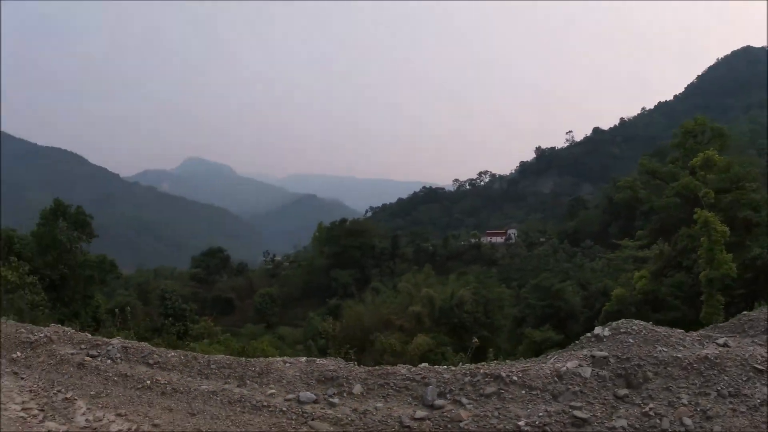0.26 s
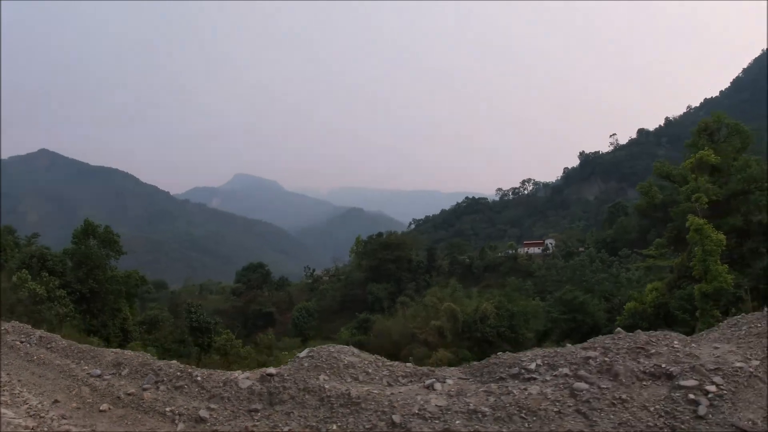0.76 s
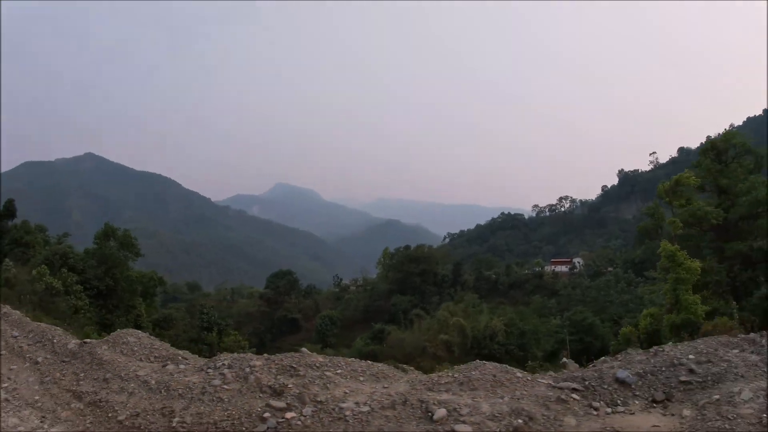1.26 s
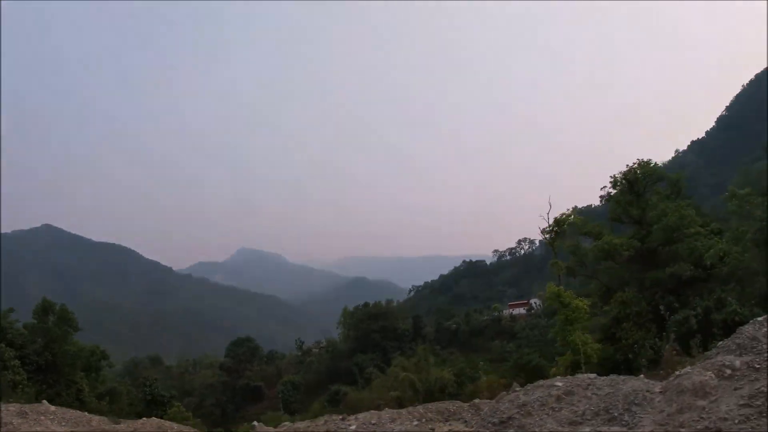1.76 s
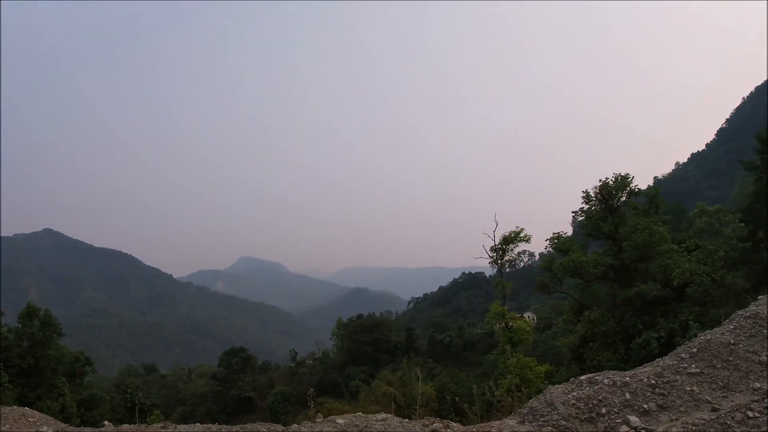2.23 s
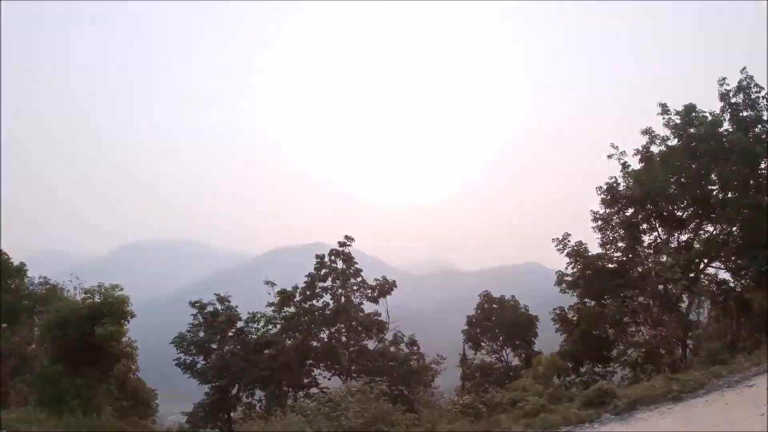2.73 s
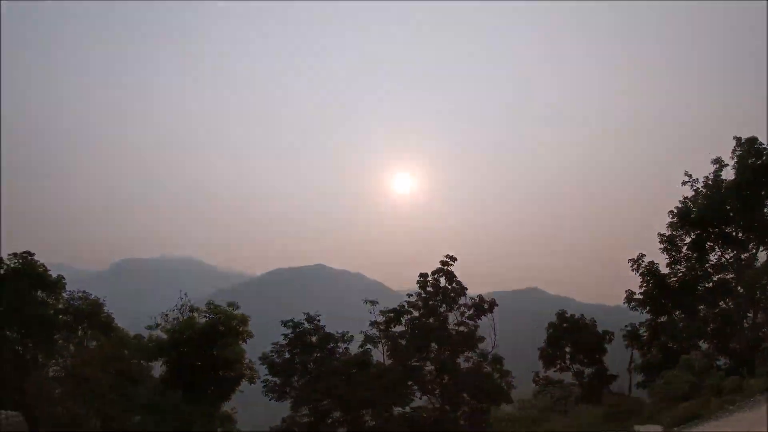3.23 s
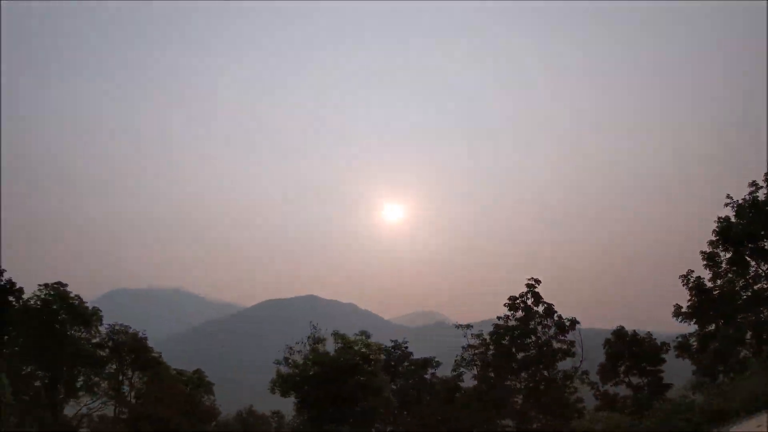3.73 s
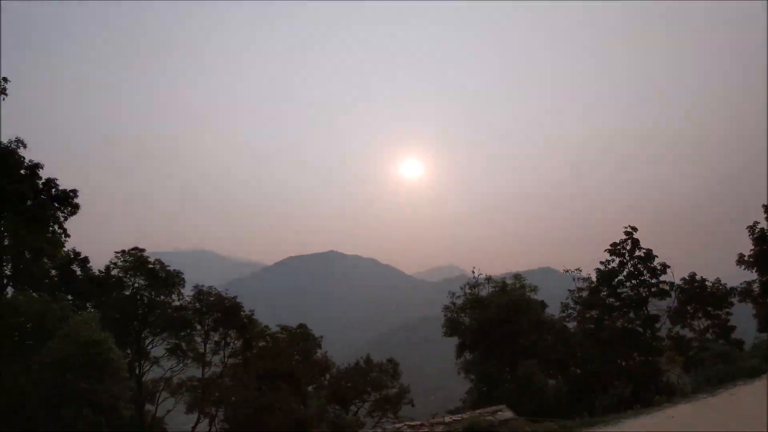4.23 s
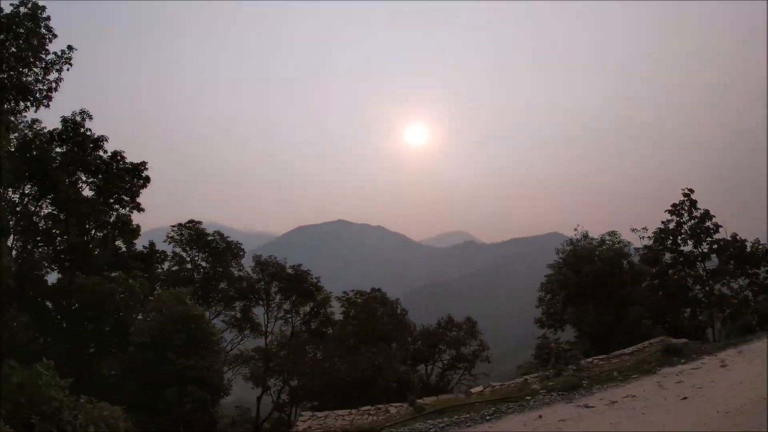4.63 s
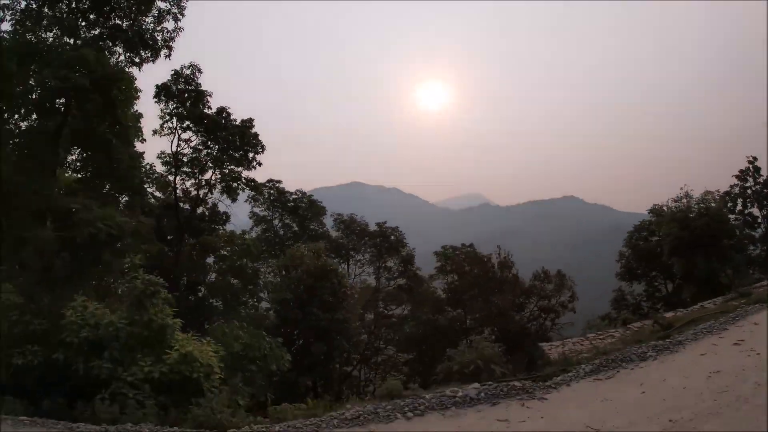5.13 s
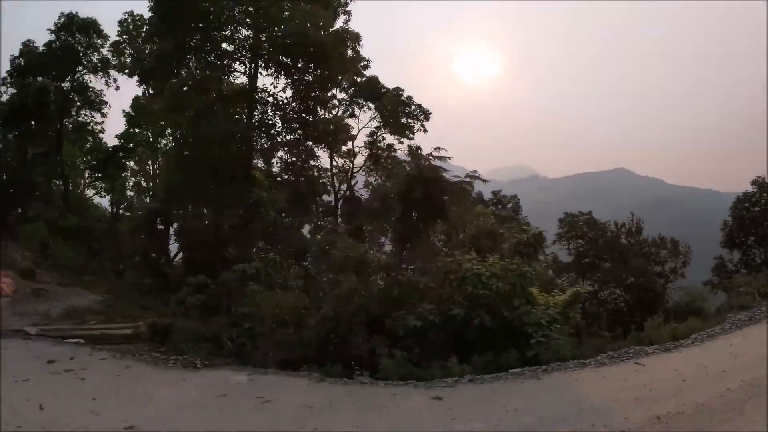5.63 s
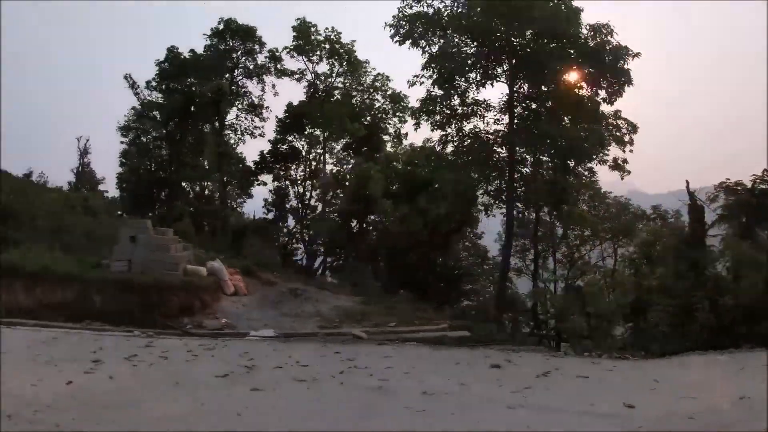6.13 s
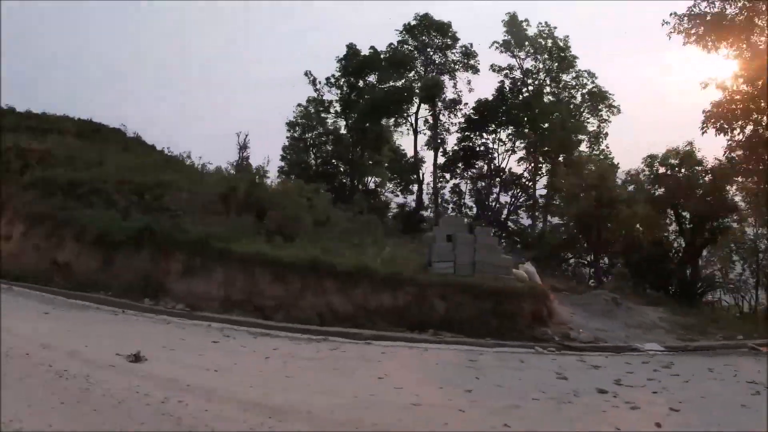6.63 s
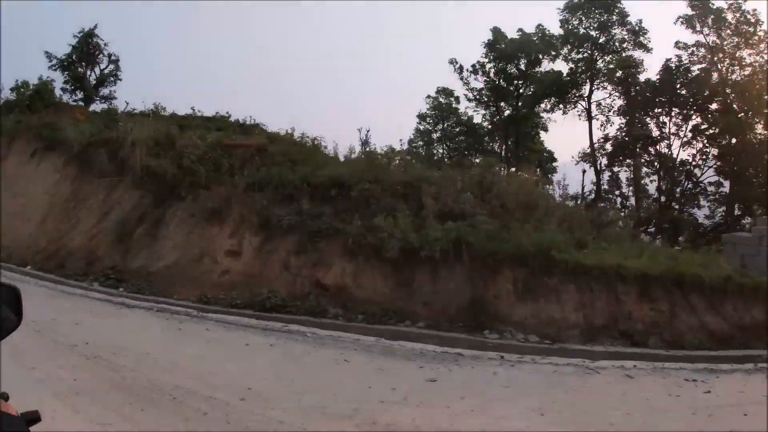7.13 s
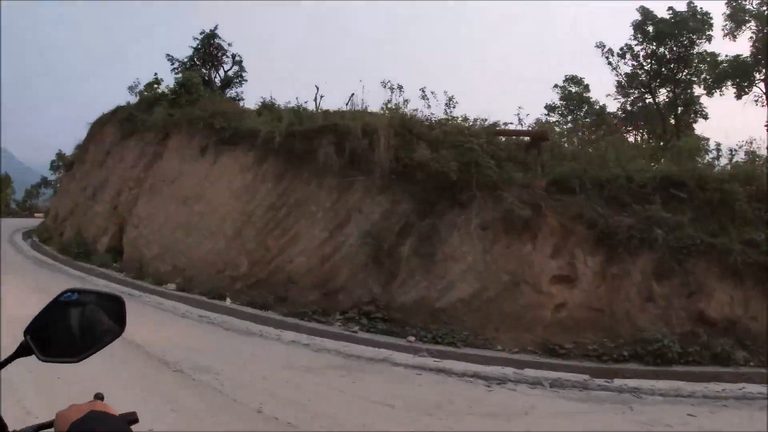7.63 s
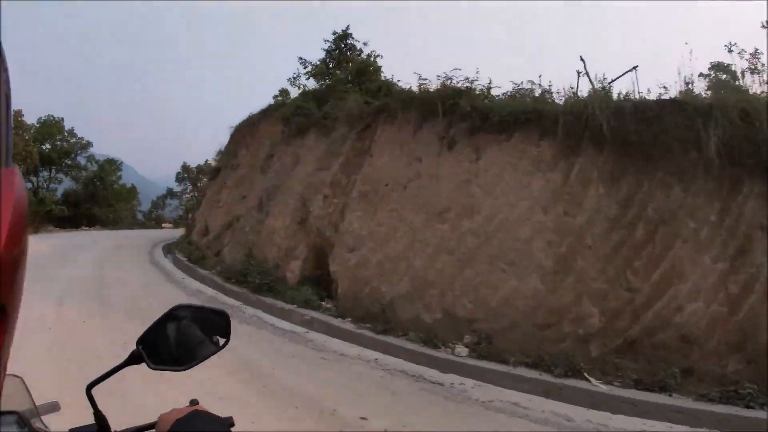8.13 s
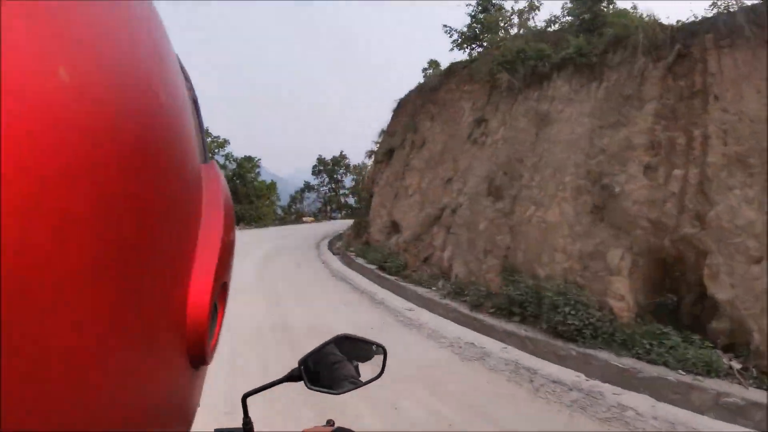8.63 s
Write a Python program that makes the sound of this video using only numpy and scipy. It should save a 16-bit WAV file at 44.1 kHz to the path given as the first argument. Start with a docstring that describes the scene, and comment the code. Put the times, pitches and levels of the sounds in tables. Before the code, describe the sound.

Close puttering single-cylinder engine and rattle on gravel end in a thud; after a tiny gap, wind thumps and roars over distant-sounding engine.

```python
"""A small single-cylinder motorcycle heard from the saddle: firing-timed noise, casing pings and exhaust tones.
Two stretches with a short silence between: close clatter on gravel, then a faint engine on a faster road.
A knock through the frame (sagging swing, tick, thuds, clinks) ends the gravel; a light modal tap falls on the road.
Wind rumbles on the microphone port as lumpy coloured noise; short noise swells slap it, crowding together at
the end, where fine crackle joins."""
import sys
import numpy as np
from scipy import signal
from scipy.fft import rfft, irfft
from scipy.io import wavfile
from scipy.ndimage import uniform_filter1d

SR = 44100
rng = np.random.default_rng(int(sys.argv[2]) if len(sys.argv) > 2 else 0)


def output_pcm(signal):
    """Save a mono or channel-first signal as 16-bit PCM at the path in sys.argv[1].

    Samples are clipped to [-1, 1] before scaling.
    """
    pcm = np.clip(np.atleast_2d(signal).T, -1, 1) * 32767
    wavfile.write(sys.argv[1], SR, np.round(pcm).astype(np.int16))


N = 391608
TIME_S = np.arange(N) / SR

# gap between the stretches: start_s, end_s
SILENCE_S = (2.2642, 2.3034)
ON_GRAVEL = TIME_S < SILENCE_S[1]

# firing rate: time_s, firings_per_s
GRAVEL_FIRING = [(0.0, 24.75), (0.5, 25.62), (1.2, 25.7), (1.6, 26.4), (2.0, 25.89), (2.3, 32)]
ROAD_FIRING = [(2.3, 22.58), (3.1, 22.25), (4.0, 22.82), (4.7, 23.72), (5.3, 24.05), (5.9, 24.98),
               (6.9, 25.15), (7.5, 25.08), (8.88, 25.2)]
GRAVEL_LAG_CYCLES, ROAD_LAG_CYCLES = 0.368, 0.85   # before the first firing
# engine clatter, one list per stretch: time_s, level_db, beat_db
CLATTER_LEVELS = [
    [(0.0, -28, -10), (0.36, -26, -18.5), (0.8, -29, -6.5), (1.5, -28.5, -4), (1.9, -29, -4),
     (2.05, -31.5, 1), (2.26, -34, 0.5)],
    [(2.31, -45, 4), (3.1, -44.5, 0.5), (4.2, -44, -0.5), (4.55, -40, 3), (4.85, -40, -1.5), (5.3, -44, -3),
     (6.4, -44.5, 2), (6.9, -42.5, -0.5), (7.47, -39, -0.5), (8.0, -43.5, 1.5), (8.7, -53.5, -9)],
]
# casing ping strength: time_s, strike_db
STRIKE_LEVELS = [(0, -8), (.68, -10), (.72, -2.5), (1.25, -1), (1.35, -5), (1.45, -1), (1.9, -2), (2.0, -7),
                 (2.26, -4), (2.31, -7), (4.2, -5), (4.55, -2), (5.3, -6), (6.4, 0), (6.9, 2), (8.0, 2.5),
                 (8.7, -9)]
# clatter spectrum: freq_hz, level_db_per_hz
GRAVEL_SPECTRUM = [(100, -31), (170, 5), (238, -2.5), (282, -3.5), (344, -1.5), (481, -8.5), (706, -2),
                   (875, -5), (1050, -2), (1190, -5.5), (1820, -4), (2000, -9), (2370, -11.5), (5090, -19),
                   (6600, -39), (8580, -91), (14500, -120)]
ROAD_SPECTRUM = [(240, -36.5), (400, 4.5), (471, -11), (512, -5), (702, -3), (754, 2), (931, -3),
                 (1400, -4), (2090, -10.5), (2410, -17.5), (2640, -16), (3500, -21.5), (4380, -23),
                 (5410, -25.5), (6600, -43), (8580, -50), (14500, -120)]
# casing and pipe resonances: centre_hz, width_hz, lift_db, ping_db
GRAVEL_RINGS = [(705, 170, 4, 0), (1070, 130, 5, 0), (1330, 80, 3, -12), (2020, 120, 2.5, 12),
                (4530, 60, 3, -18)]
ROAD_RINGS = [(947, 90, 5, -10), (2680, 230, 4, 0), (3310, 180, 3, -3), (4280, 200, 3, -6),
              (5300, 150, 2, -15)]


def engine():
    """Clatter and air hiss in both stretches; exhaust tones and rattle on gravel only."""
    gravel_count = cycles(GRAVEL_FIRING, GRAVEL_LAG_CYCLES) * ON_GRAVEL
    road_count = cycles(ROAD_FIRING, ROAD_LAG_CYCLES)
    level_db, beat_db = in_time(CLATTER_LEVELS[0] + CLATTER_LEVELS[1])
    strike_db, = in_time(STRIKE_LEVELS)
    near = clatter(gravel_count, GRAVEL_SPECTRUM, GRAVEL_RINGS, beat_db, strike_db,
                   upper_hz=1600, puff_db=2, valve_db=-2)
    faint = clatter(road_count, ROAD_SPECTRUM, ROAD_RINGS, beat_db, strike_db,
                    upper_hz=2300, puff_db=5, valve_db=-7)
    mechanical = from_db(level_db) * (np.where(ON_GRAVEL, near, faint) + air_hiss())
    return mechanical + exhaust(gravel_count) + rattle()


def cycles(firing, lag_cycles):
    """Engine cycles, one firing each, counted from the start of a stretch."""
    firings_per_s, = in_time(firing)
    started = np.arange(N) >= firing[0][0] * SR
    return np.cumsum(firings_per_s * started) / SR - lag_cycles


def clatter(count, spectrum, rings, beat_db, strike_db, upper_hz, puff_db, valve_db):
    """Patchy tyre and chain noise; its upper band swells at each firing and half a cycle later, plus casing pings."""
    cycle = np.floor(count).astype(int) + 1
    strength = from_db(1.2 * rng.standard_normal((300, 2)))[cycle]
    puff = from_db(puff_db) * strength[:, 0] * np.exp(-(count % 1) / .2)
    valve = from_db(valve_db) * strength[:, 1] * np.exp(-((count + .5) % 1) / .2)
    beat = from_db(beat_db) * uniform_filter1d(puff + valve, size=260)

    low_pass = signal.butter(4, upper_hz, "low", fs=SR, output="sos")
    high_pass = signal.butter(4, upper_hz, "high", fs=SR, output="sos")
    lower = signal.sosfilt(low_pass, coloured(spectrum, rings))
    upper = signal.sosfilt(high_pass, coloured(spectrum, rings))
    sound = lower * lumps(9.8, depth_db=0.5) + upper * (lumps(9, depth_db=1.2) + beat)

    fired = (np.diff(cycle, prepend=cycle[0]) > 0) * from_db(strike_db)
    for hz, width_hz, _, ping_db in rings:
        sound += casing_ping(fired, cycle, hz, width_hz, ping_db)
    return rms_one(sound)


def casing_ping(fired, cycle, hz, width_hz, ping_db):
    """One resonance struck at every firing, with a random strength per cycle."""
    blows = fired * from_db(ping_db + 1.6 * rng.standard_normal(300))[cycle]
    radius, angle = np.exp(-np.pi * width_hz / SR), 2 * np.pi * hz / SR
    poles = [1, -2 * radius * np.cos(angle), radius ** 2]
    ping = signal.lfilter([0, np.sin(angle)], poles, blows + 1e-18)
    for _ in range(2):   # the ring builds up over a few periods
        ping = signal.lfilter(*signal.iirpeak(hz, hz / 450, SR), ping)
    return ping


# exhaust beat: time_s, crank_tone_db, third_to_sixth_lift_db
EXHAUST_LEVELS = [(0, -36, 7), (.5, -27.5, 3), (1.2, -29.5, -1), (1.42, -24.5, -4), (1.95, -24.5, -7),
                  (2.26, -26, -6)]
# exhaust tones: multiple_of_firing_rate, level_re_crank_tone_db
EXHAUST_ORDERS = [(1, -8), (2, 0), (3, -12), (4, -16), (5, -10), (6, -22), (9, -18), (10, -22), (13, -24),
                  (14, -21)]
EXHAUST_LAG_CYCLES = 0.45   # firing to exhaust pulse


def exhaust(count):
    """Wavering harmonics of the firing rate, locked to the engine cycle; gravel only."""
    crank_db, lift_db = in_time(EXHAUST_LEVELS)
    tones = np.zeros(N)
    for order, db in EXHAUST_ORDERS:
        gain = from_db(db + lift_db * (3 <= order <= 6))
        tone = -np.cos(2 * np.pi * order * (count - EXHAUST_LAG_CYCLES))
        tones += gain * tone * lumps(5, depth_db=.9 * np.sqrt(order) + .5)
    return np.sqrt(2) * from_db(crank_db) * tones * ON_GRAVEL


# loose parts: time_s, level_db
RATTLE_LEVELS = [(0, -57), (.6, -51), (1.15, -53), (1.42, -39), (1.7, -49), (2.0, -44), (2.05, -57),
                 (2.26, -51)]
# rattle spectrum: freq_hz, level_db_per_hz
RATTLE_SPECTRUM = [(1900, -27), (2400, 4.5), (3100, 10), (3600, -5), (4400, -25), (6000, -88)]


def rattle():
    """Loose parts on gravel as fast-fluctuating band noise."""
    level_db, = in_time(RATTLE_LEVELS)
    return from_db(level_db) * coloured(RATTLE_SPECTRUM) * lumps(60, depth_db=3.5) * ON_GRAVEL


# thin hiss spectrum: freq_hz, level_db_per_hz
AIR_SPECTRUM = [(6000, -9.5), (7500, 0.5), (9500, -3.5), (11500, -14), (13000, -30), (15000, -70)]
AIR_RE_CLATTER_DB = -44


def air_hiss():
    """Thin high noise above the clatter, scaled relative to it."""
    return from_db(AIR_RE_CLATTER_DB) * coloured(AIR_SPECTRUM) * lumps(25, depth_db=2.5)


# frame knock, before the squash: time_s, level_db
KNOCK = (2.0183, -1.5)
# sagging swing: start_hz, end_hz, sag_s, t60_s
KNOCK_SWING = (434, 87, 0.00193, 0.02)
# tick modes: pitch_hz, level_db, t60_s
KNOCK_TICK_MODES = [(1100, -3, .004), (5000, -21, .005), (8500, -34, .003)]
# frame rocking before and after the knock: time_s, level_db
THUDS = [(2.0065, -7), (2.1055, -5)]
# thud mode: pitch_hz, level_db, t60_s
THUD_MODES = [(100, 0, .08)]
# small metal parts shaken by the jolt: time_s, level_db, pitch_hz
CLINKS = [(2.007, -21, 1630), (2.007, -24, 2170), (2.028, -26, 1950), (2.041, -28, 1700),
          (2.055, -24, 1650), (2.071, -31, 2200), (2.129, -29, 1750)]
CLINK_T60_S = 0.028


def knock():
    """A tick, then a heavy swing whose pitch sags as it dies; soft thuds and small clinks around it."""
    knock_s, knock_db = KNOCK
    start_hz, end_hz, sag_s, t60_s = KNOCK_SWING
    t = np.maximum(TIME_S - knock_s, 0)
    turns = end_hz * t + (start_hz - end_hz) * sag_s * (1 - np.exp(-t / sag_s))
    swing = from_db(knock_db - 60 * t / t60_s) * np.sin(2 * np.pi * turns)
    tick = struck((knock_s - .0005, knock_db), KNOCK_TICK_MODES, contact_s=0.00015)
    thuds = sum(struck(blow, THUD_MODES, contact_s=0.0063) for blow in THUDS)
    clinks = sum(struck((s, db), [(hz, 0, CLINK_T60_S)], contact_s=.0015) for s, db, hz in CLINKS)
    return swing - tick - thuds + clinks


# light tap on the road: time_s, level_db
TAP = (7.386, -18)
# tap modes: pitch_hz, level_db, t60_s
TAP_MODES = [(420, -1, 0.039), (780, 1.5, 0.031), (933, 2.5, 0.046), (1120, -2, 0.039), (1280, 0, 0.019)]


def tap():
    """One light blow ringing five decaying modes."""
    return struck(TAP, TAP_MODES, contact_s=0.0038)


def struck(blow, modes, contact_s):
    """Decaying modes set off by one blow; a longer contact softens the start."""
    blow_s, blow_db = blow
    t = np.maximum(TIME_S - blow_s, 0)
    rings = sum(from_db(blow_db + db - 60 * t / t60_s) * np.sin(2 * np.pi * hz * t)
                for hz, db, t60_s in modes)
    return rings * np.sin(np.pi / 2 * np.minimum(t / contact_s, 1)) ** 2


# eddies slapping the port: time_s, thump_db, rasp_db, snap_db, nominal_length_ms
SLAPS = [(3.1386, -5.5, -20, -34.5, 5.5), (3.154, -15, -23, -45, 4.6), (3.16, -12, -19, -37, 4.8),
         (3.169, -16.5, -26.5, -55.5, 5.8), (3.735, -23.5, -43.5, -54, 5.9), (3.756, -18, -40, -48, 10),
         (3.785, -23, -39, -61, 15), (4.229, -13.5, -32, -43, 8.3), (4.243, -18, -39, -50, 7.4),
         (4.626, -21, -30, -51, 8.3), (4.905, -40, -23, -42, 7.3), (4.932, -23.5, -30, -48, 4.2),
         (4.966, -32, -17, -39, 3.1), (4.979, -7, -17, -34, 8.7), (4.988, -8, -19, -41, 3.1),
         (5.05, -25, -30, -46, 15), (5.079, -10, -31, -53, 4.7), (5.087, -27, -13, -42, 3.1),
         (5.096, -9.5, -17, -22.5, 11.6), (5.106, -10.5, -23, -28, 5), (5.202, -13.5, -25, -47, 4.7),
         (5.216, -6.5, -11.5, -31, 3.4), (5.292, -19.5, -21.5, -37, 9), (5.394, -14.5, -22, -37, 2.5),
         (5.402, -10.5, -23.5, -51, 7.4), (5.441, -12, -26, -36.5, 3.2), (5.451, -12.5, -28, -50, 6),
         (5.475, -10.5, -19.5, -33, 7.5), (5.628, -24, -23, -69, 4.2), (5.651, -13.5, -23, -35, 20),
         (5.668, -5, -17, -19, 3.2), (5.683, -40, -16.5, -27.5, 2.4), (5.784, -11.5, -19, -59, 4.5),
         (5.958, -11.5, -35, -61, 5.2), (6.101, -8, -23, -50, 5.2), (6.107, -6.5, -10.5, -21, 3),
         (6.163, -9.5, -27.5, -55, 8.7), (6.232, -11, -38, -46, 6.2), (6.566, -13, -37, -43, 5.3),
         (6.712, -16.5, -42, -54, 4), (7.789, -10, -36, -60, 7.4), (7.824, -22, -30, -48, 11),
         (7.836, -10.5, -25.5, -54, 11.4), (8.028, -15.5, -27, -59, 7.4), (8.113, -19, -31, -60, 12.5),
         (8.137, -5, -39, -51, 1.7), (8.154, -7, -22, -57, 3.3), (8.201, -10, -29, -44, 9.1),
         (8.218, -17, -25, -44, 4), (8.231, -15.5, -27.5, -37, 4.4), (8.2495, -12, -19, -20, 2.1),
         (8.253, -11, -20, -30, 2.3), (8.3228, -14, -15, -24.5, 2.6), (8.327, -20, -23, -35, 2.5),
         (8.337, -10.5, -22, -32, 6.7), (8.347, -12, -11.5, -34, 4.5), (8.365, -10.5, -25, -43, 11),
         (8.378, -10, -9, -18, 1.9), (8.385, -17.5, -22, -42.5, 2.6), (8.399, -16, -24, -38, 15),
         (8.408, -23, -28, -28, 3.2), (8.414, -22, -16, -25.5, 3.2), (8.428, -23, -14.5, -32, 7.6),
         (8.434, -16, -20, -33.5, 3.1), (8.439, -24, -14, -34, 3), (8.459, -17, -19, -35, 5.4),
         (8.474, -9, -19, -37, 3.7), (8.482, -17, -19, -31, 6), (8.489, -15, -21, -37, 3.6),
         (8.503, -11, -26, -39, 12), (8.524, -8, -19.5, -40, 3), (8.54, -10, -19.5, -34, 3.9),
         (8.55, -12, -26, -40.5, 6.1), (8.578, -26, -19, -38, 3.3), (8.615, -7, -20, -26, 5.7),
         (8.625, -11, -16, -41, 5), (8.631, -8.5, -13, -31, 1.6), (8.64, -15, -14, -28.5, 2.5),
         (8.643, -11.5, -10, -30, 2.4), (8.662, -25, -32, -45.5, 2.4), (8.668, -19, -15, -29, 3.4),
         (8.692, -12, -23, -19, 2.7), (8.702, -20, -21, -38, 4), (8.71, -10, -16.5, -33, 5),
         (8.719, -16, -19.5, -36, 4.1), (8.737, -22, -12.5, -31, 8.1), (8.753, -17, -33, -41, 3.3),
         (8.771, -8.5, -15, -26.5, 3), (8.783, -25, -26, -40, 2.3), (8.79, -6, -20, -25.5, 4.1),
         (8.798, -17, -19, -41, 4), (8.811, -22, -17, -33, 3.6), (8.816, -17, -22, -40, 2.6),
         (8.827, -31, -23, -31, 2.9), (8.834, -25, -13, -33, 2.5), (8.843, -18, -19, -38, 3.5),
         (8.851, -11, -17, -42, 4.7), (8.86, -14, -16, -34, 5.7), (8.866, -25, -27, -41, 2.1),
         (8.871, -29, -27, -44, 4.5)]
# slap layer spectra: freq_hz, level_db_per_hz
THUMP_SPECTRUM = [(60, 5), (120, 6.5), (250, 3), (450, -8), (800, -20), (1500, -73.5)]
RASP_SPECTRUM = [(250, -22.5), (500, 2.5), (1000, -2), (1800, -12), (2600, -27), (4000, -59.5)]
SNAP_SPECTRUM = [(1000, -5), (1700, 10), (2500, 11), (3400, 0.5), (4500, -11.5), (6000, -17.5), (7500, -42),
                 (10000, -65)]


def slaps():
    """Each eddy is a short swell of thumping noise with a ragged rasp and a sharp snap at its core."""
    rows = np.array(SLAPS)
    length_shares = np.array([.9, .5, .3])   # brighter layers are briefer
    thump_gain, rasp_gain, snap_gain = swells(rows[:, 0], rows[:, 1:4], rows[:, 4:] * length_shares)
    thump = thump_gain * steady(coloured(THUMP_SPECTRUM), size=350)
    rasp = rasp_gain * steady(coloured(RASP_SPECTRUM), size=130) * lumps(260, depth_db=1.5)
    snap = snap_gain * steady(coloured(SNAP_SPECTRUM), size=60)
    return thump + rasp + snap


# wind between buffets: time_s, rumble_db, flutter_db, whip_db
WIND_LEVELS = [(0, -38, -28, -40), (.6, -31, -33.5, -52), (1.3, -31.5, -36, -52), (1.95, -32, -39, -51),
               (2.3, -25.5, -33, -42), (2.9, -30, -32, -37), (3.2, -21, -31.5, -34),
               (3.65, -29, -42.5, -37), (4.3, -27, -33, -35), (4.85, -19, -22.5, -27.5),
               (5.2, -31.5, -36.5, -37.5), (5.7, -24.5, -32.5, -35.5), (6.3, -27.5, -26, -34.5),
               (7.15, -28.5, -30.5, -38), (7.6, -15.5, -30.5, -35.5), (8.0, -16, -24, -34.5),
               (8.3, -20, -19, -28), (8.43, -17, -16, -19.5), (8.57, -22, -18, -28), (8.66, -20, -16, -24),
               (8.7, -19, -15, -19), (8.88, -22, -20, -19)]
# soft low pushes of air on the port: time_s, rumble_db, flutter_db, length_ms
BUFFETS = [(2.0, -26, -26, 83), (2.125, -21, -23, 20), (2.34, -28, -17.5, 13), (2.42, -28, -22.5, 32),
           (2.6, -37, -36, 31), (2.8, -31, -35, 120), (3.031, -20.5, -28, 60), (3.161, -21, -17, 8.2),
           (3.37, -22, -20, 31), (3.59, -22, -28.5, 41), (3.784, -17.5, -17, 77), (3.927, -21, -19, 33),
           (4.239, -25, -18, 168), (4.71, -18.5, -18.5, 55), (4.97, -7, -29, 16), (5.089, -19.5, -28, 20),
           (5.207, -29, -18.5, 39), (5.292, -19, -9, 8.3), (5.401, -13.5, -28, 15), (5.51, -23, -16.5, 56),
           (5.63, -30, -14.5, 40), (5.76, -11, -18.5, 66), (5.95, -29, -22, 13), (6.09, -17, -36, 55),
           (6.168, -24, -10.5, 14), (6.57, -41, -25, 55), (6.718, -18, -26, 30), (6.92, -21, -33, 44),
           (7.06, -13, -22, 16), (7.141, -27, -21.5, 7.1), (7.31, -30.5, -25.5, 86),
           (7.8, -31.5, -23.5, 96), (8.02, -32, -24, 45)]
# eddy spectra, large to small: freq_hz, level_db_per_hz
RUMBLE_SPECTRUM = [(8, 0.5), (16, 12.5), (30, 12.5), (50, 13), (75, 10.5), (110, -0.5), (200, -69.5)]
FLUTTER_SPECTRUM = [(50, -4.5), (75, 0.5), (110, 4.5), (160, -4.5), (220, -22), (400, -65)]
WHIP_SPECTRUM = [(120, -21), (180, 5.5), (260, -3), (400, -11.5), (700, -19), (1200, -34.5), (2500, -66)]
BUFFET_WHIP_RE_FLUTTER_DB = -16


def wind():
    """Lumpy low noise of air tumbling over the port in three eddy sizes, all pushed by buffets."""
    rumble_gain, flutter_gain, whip_gain = from_db(in_time(WIND_LEVELS))
    rows = np.array(BUFFETS)
    rumble_push, flutter_push = swells(rows[:, 0], rows[:, 1:3], rows[:, [3, 3]])
    whip_push = from_db(BUFFET_WHIP_RE_FLUTTER_DB) * flutter_push
    rumble = (rumble_gain * lumps(7.9, depth_db=1.0) + rumble_push) * coloured(RUMBLE_SPECTRUM)
    flutter = (flutter_gain + flutter_push) * coloured(FLUTTER_SPECTRUM) * lumps(27, depth_db=3.5)
    whip = (whip_gain + whip_push) * coloured(WHIP_SPECTRUM) * lumps(34, depth_db=3.0)
    return rumble + flutter + whip


CRACKLE_PER_S, CRACKLE_FROM_S = 420, 8.325   # rate before clumping; onset
CRACKLE_SPREAD_DB, CRACKLE_RE_WHIP_DB, CRACKLE_SNAP_DB = 3.5, -16, -18   # snap: bright edge


def crackle():
    """Fine grains torn loose in clumps by strong whipping; level follows the whip."""
    chance = CRACKLE_PER_S * lumps(25, depth_db=4.0) / SR
    size_db = CRACKLE_SPREAD_DB * np.minimum(rng.exponential(1, N), 4)
    grains = (rng.random(N) < chance) * from_db(size_db) * (TIME_S > CRACKLE_FROM_S)
    # each grain lasts a millisecond or two
    gate = np.convolve(grains, np.hanning(110), "same") * np.sqrt(SR / CRACKLE_PER_S / 90)
    noise = coloured(RASP_SPECTRUM) + from_db(CRACKLE_SNAP_DB) * coloured(SNAP_SPECTRUM)
    whip_db = in_time(WIND_LEVELS)[2]
    return from_db(whip_db + CRACKLE_RE_WHIP_DB) * gate * noise


def swells(times_s, levels_db, lengths_ms):
    """Bell-shaped gains: one input row per event, one output row per layer; length is peak to 1/e."""
    gains = np.zeros((np.shape(levels_db)[1], N))
    for s, db, ms in zip(times_s, levels_db, lengths_ms):
        near = slice(int((s - .25) * SR), int((s + .25) * SR))
        offset_ms = 1000 * (TIME_S[near] - s)
        gains[:, near] += from_db(db)[:, None] * np.exp(-(offset_ms / ms[:, None]) ** 2)
    return gains


def steady(x, size):
    """Noise with its chance swells evened out over `size` samples."""
    return x / np.sqrt(uniform_filter1d(x ** 2, size=size) + .05)


def coloured(spectrum, rings=()):
    """Noise with the given spectrum and resonant lifts; rms 1."""
    hz = np.maximum(np.fft.rfftfreq(N, 1 / SR), 1)
    points = np.array(spectrum)
    level_db = np.interp(np.log(hz), np.log(points[:, 0]), points[:, 1], left=-90)
    for centre_hz, width_hz, lift_db, *_ in rings:
        level_db += lift_db / (1 + (2 * (hz - centre_hz) / width_hz) ** 2)
    return rms_one(irfft(rfft(rng.standard_normal(N)) * from_db(level_db), N))


def lumps(rate_hz, depth_db):
    """Random gain that swells and sinks about `rate_hz` times a second; rms 1."""
    step = 40   # samples per control point
    pole = np.exp(-2 * np.pi * rate_hz * step / SR)
    white = rng.standard_normal(N // step + 2002)
    slow = rms_one(signal.lfilter([1], [1, -2 * pole, pole ** 2], white)[2000:])   # drop the settling
    return rms_one(from_db(depth_db * np.interp(np.arange(N) / step, np.arange(len(slow)), slow)))


def in_time(rows):
    """Columns of a curve at every sample."""
    s, *columns = np.transpose(rows)
    return [np.interp(TIME_S, s, column) for column in columns]


def from_db(db):
    """Decibels to gain."""
    return 10 ** (np.asarray(db) / 20)


def rms_one(x):
    """Scale to unit rms."""
    return x / np.sqrt(np.mean(x ** 2) + 1e-20)


PORT_CUT_HZ = 5900


def scene():
    """Gusts and the knock squash at the capsule, whose port dulls the gusts; engine and tap add unsquashed."""
    gusts = 0.84 * np.tanh((wind() + slaps() + crackle()) / 0.96)
    gusts = signal.sosfilt(signal.butter(8, PORT_CUT_HZ, fs=SR, output="sos"), gusts)
    squashed_knock = 0.85 * np.tanh(knock() / 0.64)
    return (engine() + squashed_knock + tap() + gusts)[None]


CUTOFF_HZ = 15600


def record(dry):
    """The sound stops dead between the stretches and swells back within a moment; the top is cut."""
    start_s, end_s = SILENCE_S
    back = np.clip(0.21 + (TIME_S - end_s) / 0.019, 0, 1) * (TIME_S > end_s)
    gated = dry * ((TIME_S < start_s) + back)
    return signal.sosfilt(signal.cheby2(12, 70, CUTOFF_HZ, fs=SR, output="sos"), gated)


dry = scene()
out = record(dry)
output_pcm(out)
```